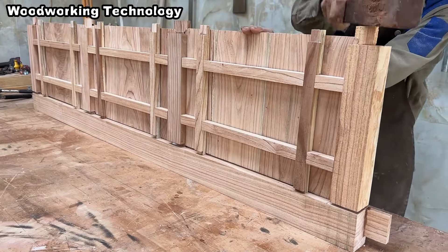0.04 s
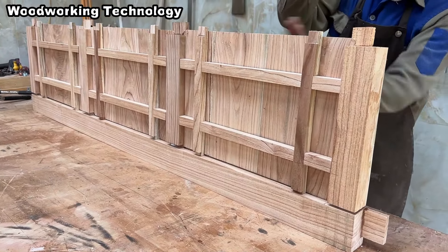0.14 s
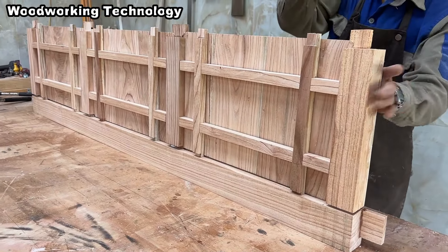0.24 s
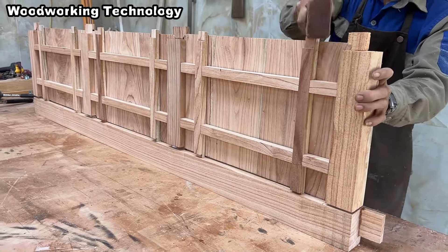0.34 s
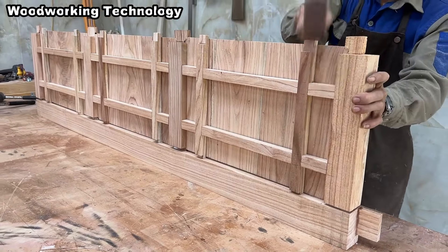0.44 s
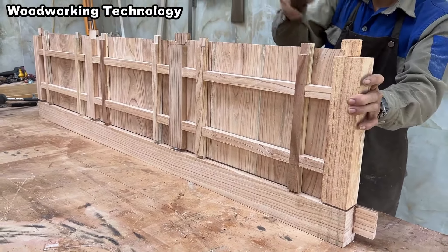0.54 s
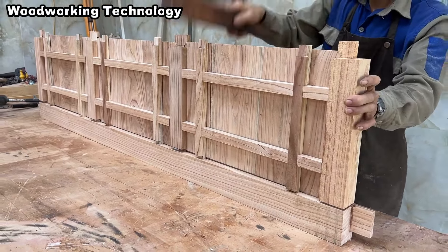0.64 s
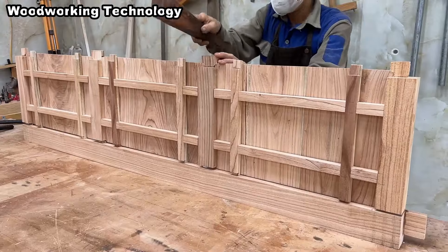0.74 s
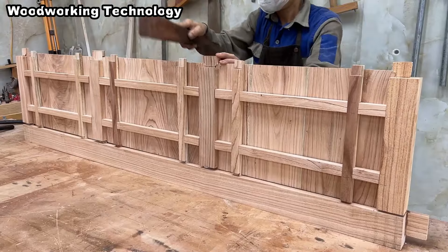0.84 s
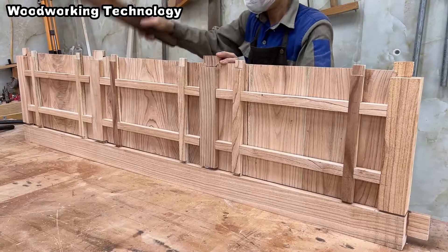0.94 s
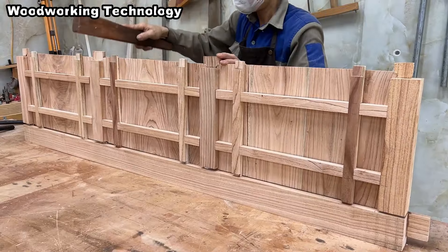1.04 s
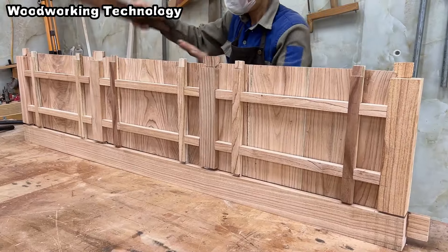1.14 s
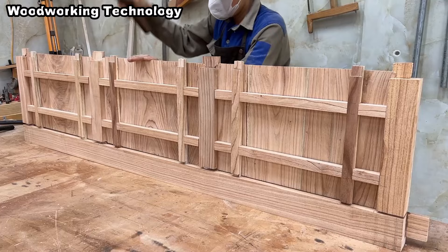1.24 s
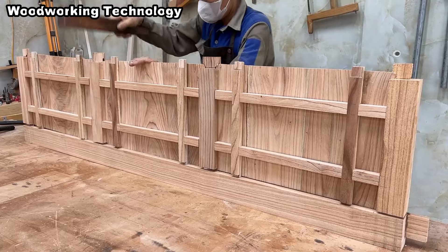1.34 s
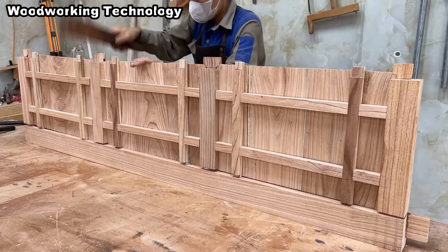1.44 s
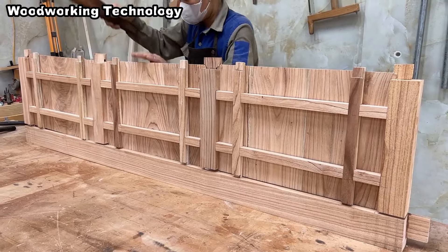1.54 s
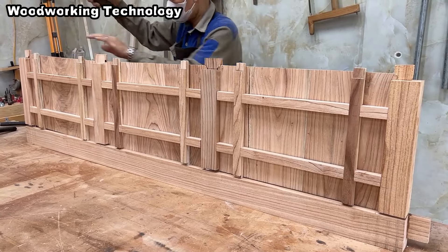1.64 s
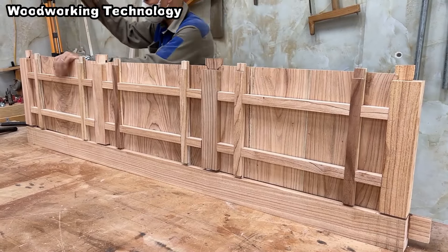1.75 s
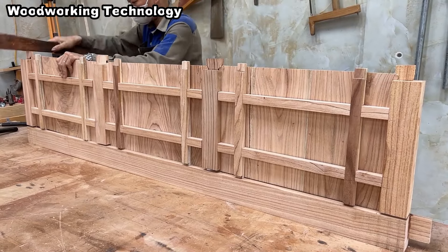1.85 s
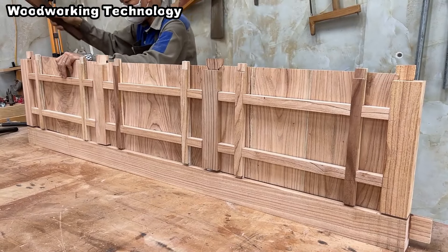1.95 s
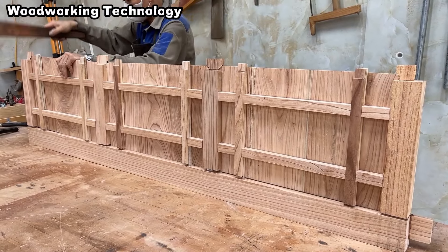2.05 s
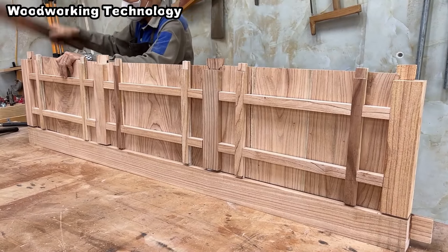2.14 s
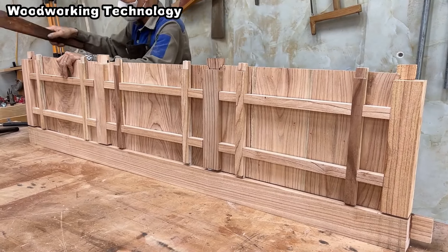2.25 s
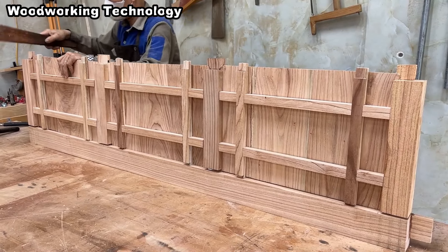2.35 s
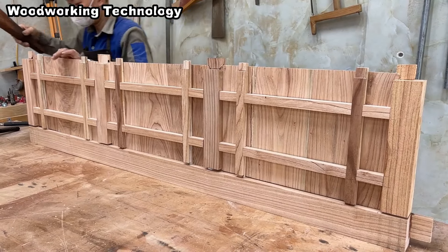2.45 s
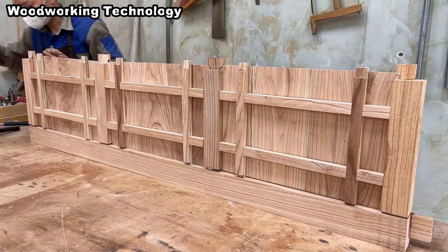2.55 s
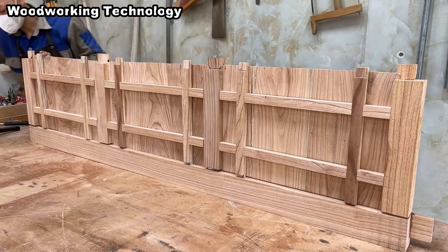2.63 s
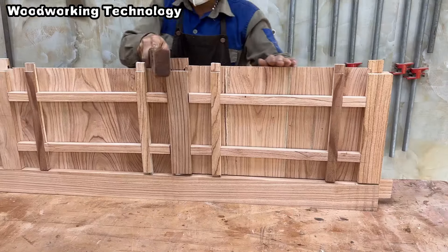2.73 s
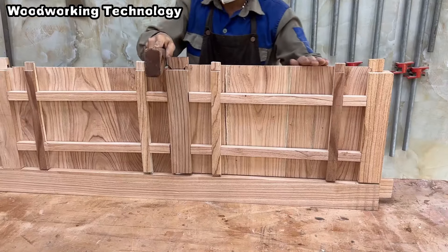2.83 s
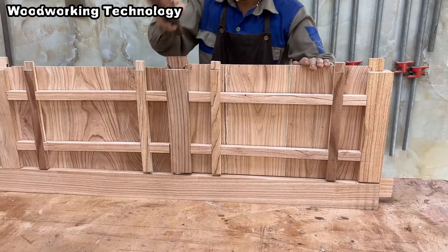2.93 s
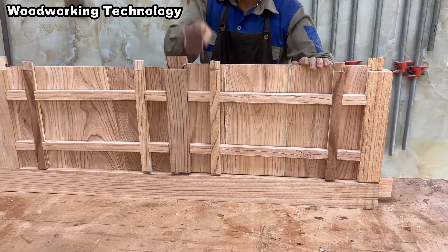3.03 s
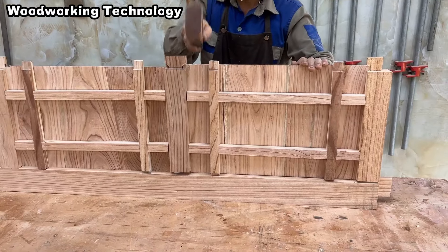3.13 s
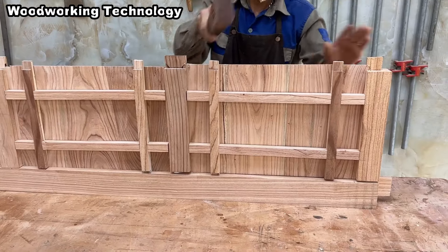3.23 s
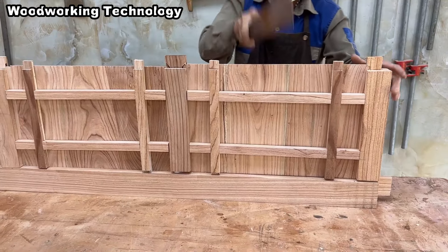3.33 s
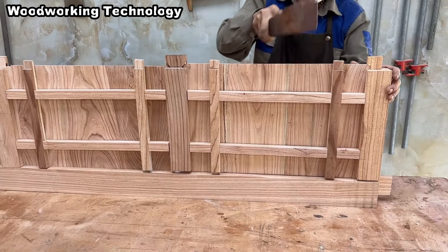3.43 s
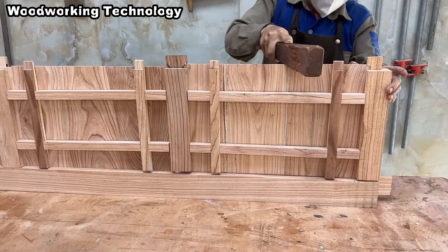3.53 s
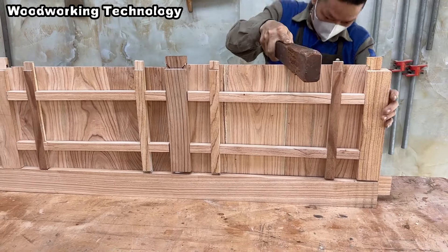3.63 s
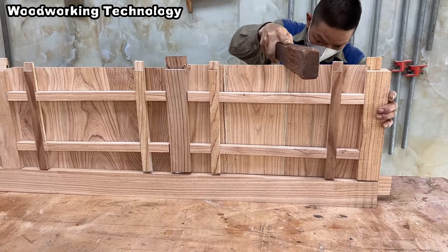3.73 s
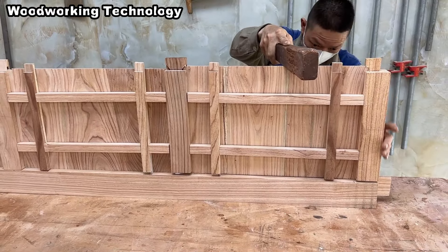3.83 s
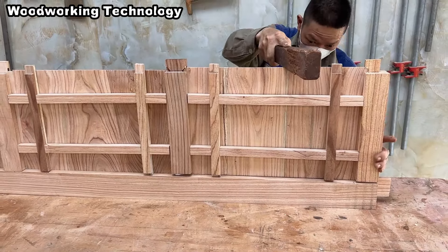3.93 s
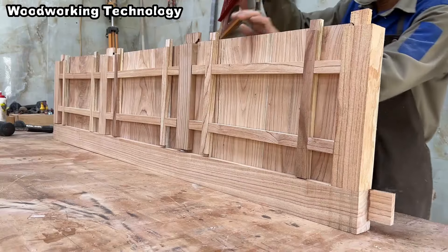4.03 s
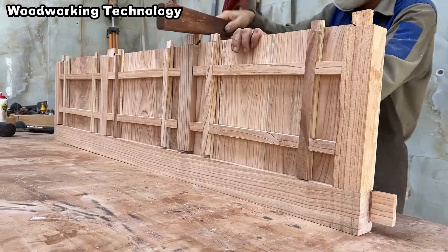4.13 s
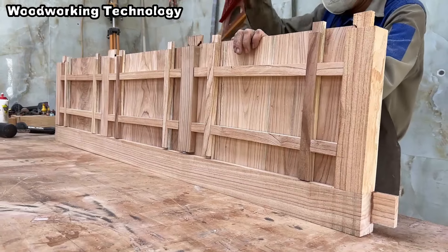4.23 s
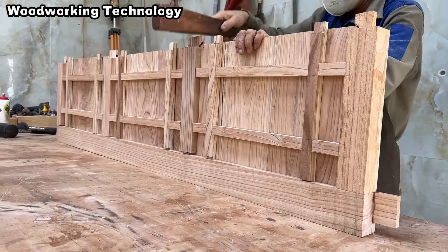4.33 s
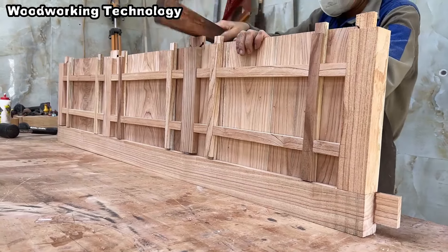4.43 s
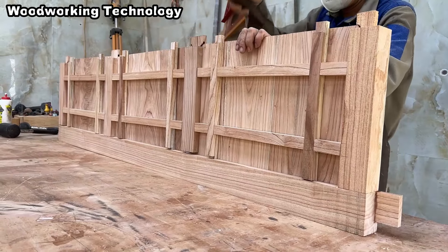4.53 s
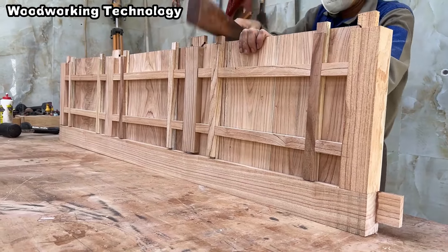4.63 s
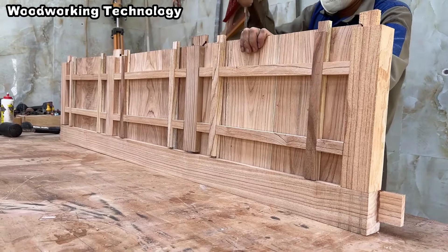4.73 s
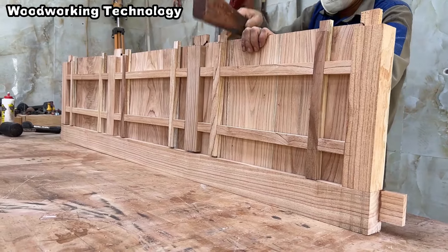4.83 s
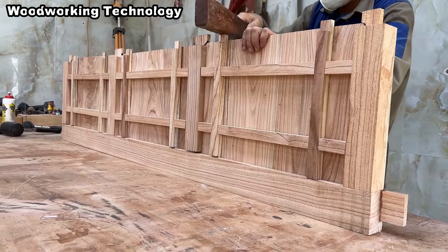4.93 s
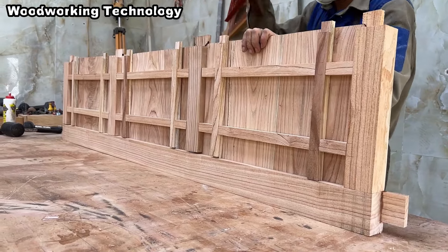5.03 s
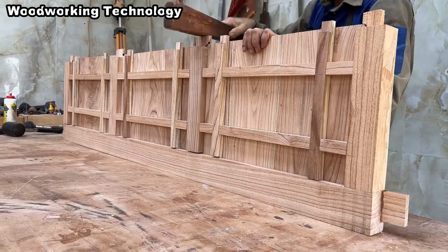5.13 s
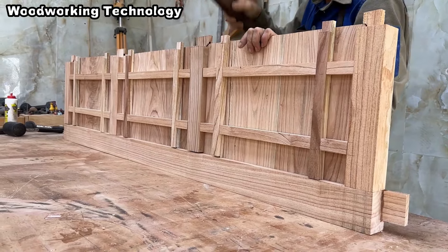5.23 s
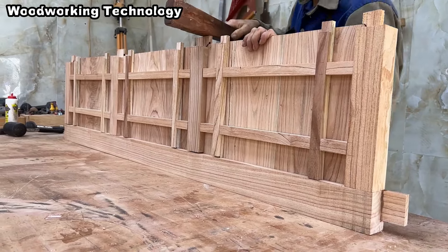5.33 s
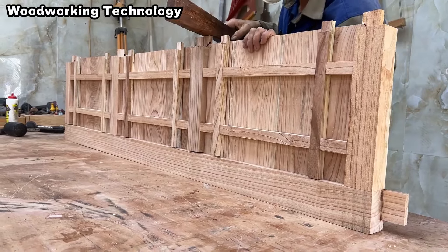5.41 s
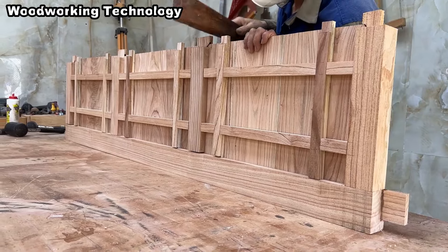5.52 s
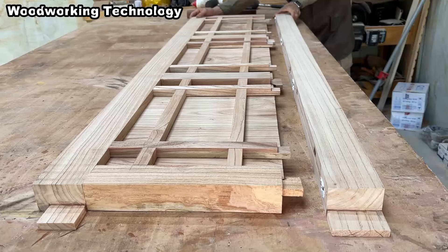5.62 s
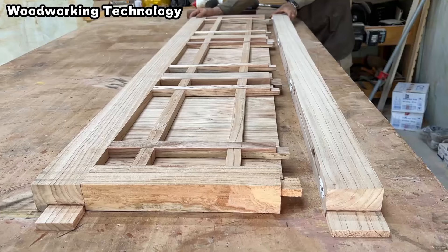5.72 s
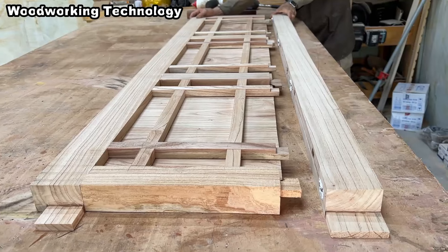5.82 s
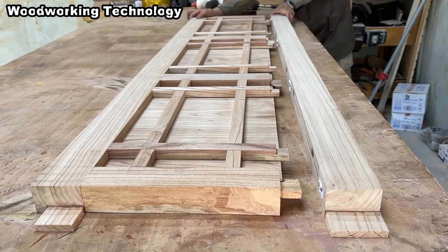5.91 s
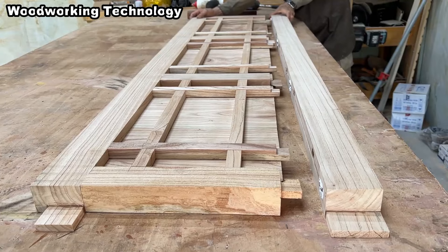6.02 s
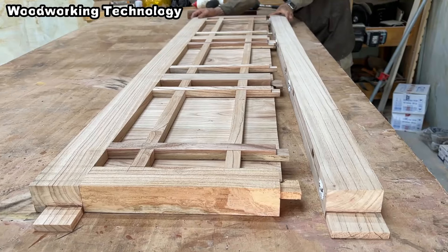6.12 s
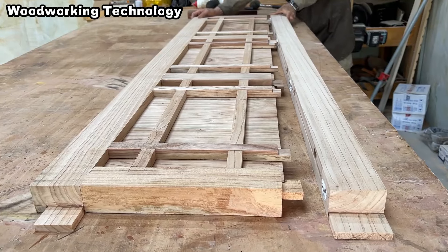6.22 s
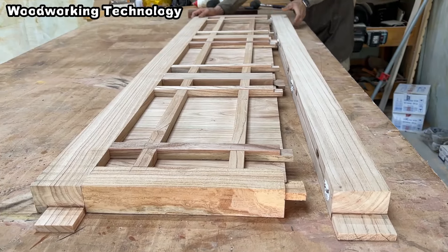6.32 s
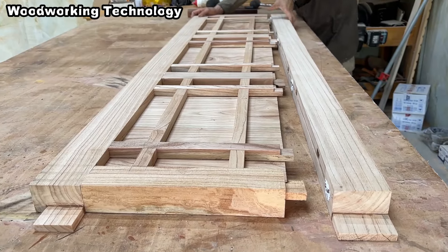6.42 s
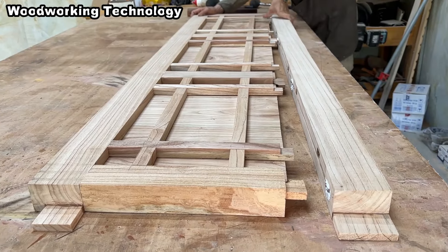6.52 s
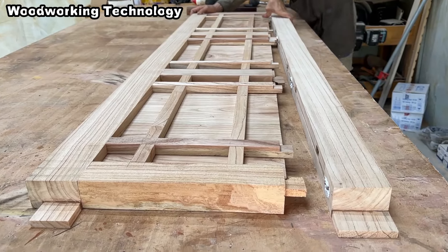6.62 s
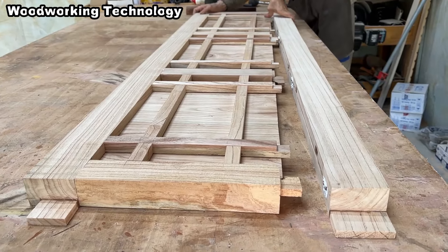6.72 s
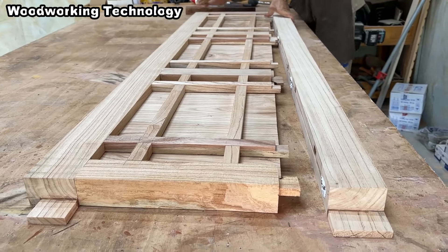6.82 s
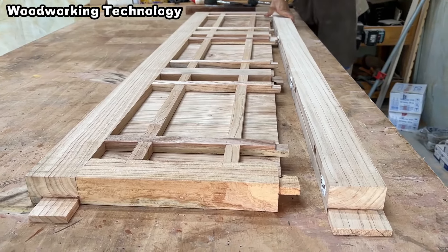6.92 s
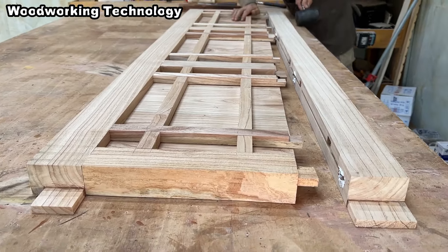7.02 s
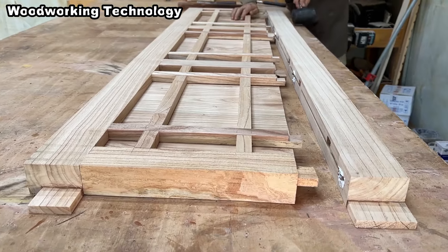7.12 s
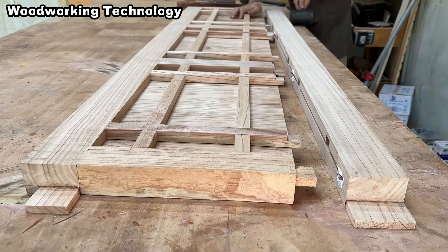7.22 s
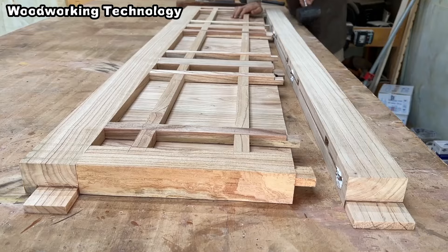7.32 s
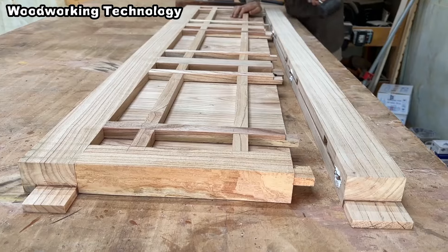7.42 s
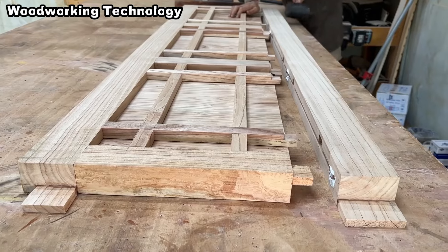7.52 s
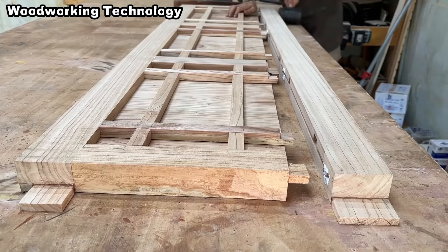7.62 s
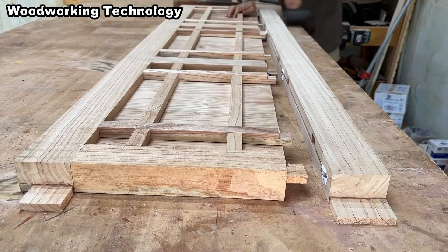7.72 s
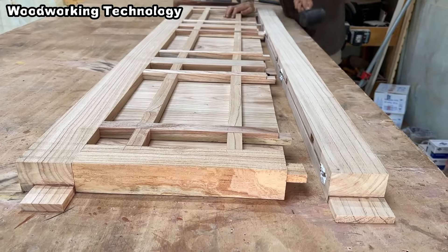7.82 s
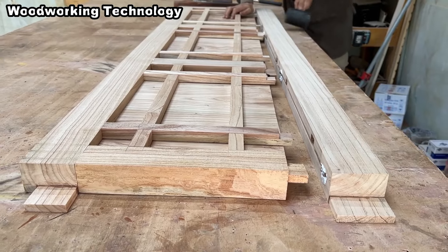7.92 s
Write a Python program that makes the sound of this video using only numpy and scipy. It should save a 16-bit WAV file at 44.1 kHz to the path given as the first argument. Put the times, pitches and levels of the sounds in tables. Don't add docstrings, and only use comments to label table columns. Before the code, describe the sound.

In a small, lively workshop, a mallet strikes a slatted wooden panel, picked up closely by a small microphone with thin bass and slight grain. Two pairs of hard knocks open the first 0.8 seconds, then a clipped blow and a tiny silent cut. From 0.82 to 2.5 quick blows move along a rail, bright and cracking at first, then deeper and duller. After a cut at 2.8, six uneven knocks follow until 3.65, then a short rub and woody creak near 3.77. From 4.25 to 5.4 eight more blows ring and rattle the slats. At 5.72 a low machine hum enters with faint fast metal clinks until 6.2; a dull palm slap lands at 6.27, wood knocks down at 6.72, and hands pat and slide. After another cut at 7.14, soft taps and rubbing lead to three loud blows at 7.6, 7.76 and 7.9.

```python
import sys
import numpy as np
from scipy import signal
from scipy.fft import rfft, irfft
from scipy.io import wavfile
from scipy.ndimage import uniform_filter1d

SR = 44100
rng = np.random.default_rng(int(sys.argv[2]) if len(sys.argv) > 2 else 0)


def undo_db(level):
    steps = np.asarray(level, float) / 20
    return 10 ** steps


def int16_out(signal):
    q = np.round(np.clip(np.atleast_2d(signal).T, -1, 1) * 32767)
    wavfile.write(sys.argv[1], SR, q.astype(np.int16))


N = 351036
LEAD = 600

# start in seconds, end in seconds.
VIEWS = [
    (0, .8137),
    (.833, 2.787),
    (2.805, 4.129),
    (4.148, 5.70),
    (5.722, 7.133),
    (7.152, 8),
]
# level in dB; the further the work stands, the wetter.
VIEW_ROOM_DB = [-30, -29, -29, -28, -29, -30]
VIEW_AIR_DB = [-52.5, -55.5, -58.5, -55, -50, -51.5]
VIEW_LAG = [0, 0, 3, 4, 0, 0]

# frequency in Hz, density in dB per Hz.
AIR_TONE = [(18, -77), (30, -56), (116, -1.5), (253, -10), (286, -16.5), (333, -13), (397, -20.5),
            (1580, -30), (12000, -45.5), (15600, -77), (22000, -120)]
# frequency in Hz, density in dB per Hz.
MACHINE_TONE = [(18, -79), (30, -52), (72, -46), (98, -7.5), (165, -3), (239, -20.5), (437, -11),
                (526, -25), (1350, -29), (5900, -42.5), (16000, -45.5)]
# frequency in Hz, level in dB.
HUM = [(103, -50), (204.6, -67), (240.5, -47), (289.5, -54.5)]
# start in seconds, level in dB.
CLINKS = [(5.849, -62), (5.92, -66), (5.959, -57), (5.981, -63.5), (6.033, -63), (6.078, -58), (6.117, -66),
          (6.157, -63), (6.198, -63)]
# frequency in Hz, level in dB, t60 in seconds.
CLINK_MODES = [(5840, 1.5, 0.012), (8700, -1, .01), (10100, -6, .01), (12400, 5, 0.013), (13500, -2, .01),
               (15300, -1.5, .01)]
# start in seconds, length in seconds, level in dB.
SLIDES = [(3.753, 0.078, -49), (5.73, 0.24, -61), (5.966, 0.1, -71), (6.073, 0.033, -67),
          (6.511, 0.41, -63), (6.819, 0.1084, -46.5), (6.927, 0.061, -52.5), (7.112, 0.27, -59.5),
          (7.245, 0.1, -61), (7.348, 0.039, -53), (7.414, 0.094, -55.5)]
# frequency in Hz, density in dB per Hz.
SLIDE_TONE = [(500, -13.5), (900, -10), (2000, -17.5), (4000, -20.5), (8000, -24.5), (13000, -25),
              (16000, -36.5)]
# start in seconds, length in seconds, start pitch in Hz, end pitch in Hz,
# level in dB, overtone level in dB.
SQUEAKS = [
    (3.771, 0.041, 545, 408, -40, -24),
    (3.943, 0.052, 2100, 2090, -73.5, -60),
    (3.973, 0.026, 2800, 2810, -57.5, -75),
]

# start in seconds, 500-1600 Hz level in dB, knock in dB, crack in dB,
# click pitch in Hz.
POST = [
    (0.015, -10.5, -1, -17.5, 2700),
    (0.1648, -9.5, -3, -14, 2680),
]
POST_TOP = [
    (0.4715, -9.5, -5.5, -12.5, 3700),
    (0.611, -7, -5, -20, 4000),
]
RAIL = [
    (0.824, -20.5, 8, 4, 2320),
    (0.9397, -11, -5, -8.5, 3640),
    (1.226, -13, -4, -12, 3620),
]
RAIL_EDGE = [
    (1.128, -12, -9, -9.5, 4100),
]
RAIL_END = [
    (1.4332, -12.5, -2, -8, 2400),
    (1.6143, -10.5, -2.6, -14, 1400),
]
FAR_END = [
    (1.986, -5.5, -8, -20, 1500),
    (2.1417, -5, -6.5, -19.5, 1550),
    (2.313, -5.5, -6.5, -18.5, 1550),
    (2.4325, -7.5, -8, -26, 2500),
]
MIDDLE = [
    (2.8648, -12.5, -1.5, -7.5, 2540),
]
MIDDLE_LOW = [
    (2.982, -12, -4, -15.5, 2000),
    (3.3045, -7, -1.5, -20.5, 1950),
]
NEAR_END = [
    (3.1887, -17, 6, -6, 2500),
    (3.4937, -8, -4.5, -13, 2450),
    (3.6392, -12.5, 2.5, -14.5, 2300),
]
BACK = [
    (4.2494, -10.5, -3, -6.5, 2380),
    (4.444, -12, -6.5, -10, 2390),
    (5.26, -10.5, -5, -10, 2500),
]
BACK_SQUARE = [
    (4.5888, -8, -7, -16, 2500),
    (5.4124, -9.5, -5.5, -13.5, 2670),
]
SLAT = [
    (4.785, -6.5, -13.5, -14.5, 4000),
    (4.941, -7.5, -13, -13.5, 3500),
]
SLAT_SQUARE = [
    (5.0516, -6.5, -11, -22, 2600),
]
PALM = [
    (6.2725, -5, -21, -38, 1050),
]
TAP = [
    (6.022, -35, -27, -32, 930),
    (7.184, -32, -26, -36, 700),
    (7.331, -31, -27, -30, 810),
]
DROP = [
    (6.7216, -10.5, -11.5, -30, 1270),
]
STILE = [
    (7.6132, -3, -9.5, -25.5, 1420),
    (7.7638, -3.5, -11.5, -26, 1490),
    (7.8953, -4, -10, -26, 1500),
]
# start in seconds, level in dB, knock in dB, crack in dB,
# left minus right in dB.
TICKS = [
    (0.415, -52, 2, 1, 1),
    (0.8107, -11, -3, -7, 2),
    (2.77, -77.5, -6, -17.5, -4),
    (5.69, -37.5, -3.5, -8.5, 6.5),
    (6.51, -62.5, -44, 9.5, 13.5),
    (7.127, -55, 0, -27, -11),
    (7.205, -33.5, -11, -44, 2),
]
# start in seconds, level in dB, knock in dB, crack in dB, left minus right in dB.
PATS = [
    (6.832, -32.5, -4.5, -43, 0.1),
    (6.942, -33.5, -8.5, -31.5, -0.5),
]

# frequency in Hz, level in dB, t60 in seconds.
POST_MODES = [(189, -9.5, 0.055), (238, 0, 0.06), (300, -6.5, .07), (447, -8, 0.05), (554, -7.5, 0.033),
              (632, -3, 0.086), (724, -4.5, .07), (920, -16, 0.092), (1385, 2.5, .07), (1448, -9, .07),
              (1726, -3, .08), (2450, -1.5, .085), (2960, -7, .04)]
POST_TOP_MODES = [(177, 5, 0.039), (282, -5, 0.14), (413, -6.5, 0.045), (494, -8, 0.12), (580, -9.5, .12),
                  (713, -2, 0.13), (850, -2.5, .06), (1264, -2.5, .06), (1390, -7, 0.076), (1489, -1, 0.12),
                  (1605, -7, 0.052), (1700, -7, 0.078), (2460, -11.5, .08)]
RAIL_MODES = [(128.3, -6, .2), (186, -2, .07), (253, -1, 0.1), (313.7, -3.5, .07), (390, -1, .1),
              (540, 6, 0.068), (603, -2.5, 0.13), (713, -7.5, 0.1), (772, -2.5, 0.063), (833, -3, 0.088),
              (940, -4.5, 0.13), (1058, -5, 0.18), (1315, -8, 0.16), (1570, -4, 0.074)]
RAIL_END_MODES = [(135, -4, 0.16), (217, 0.5, 0.084), (289.7, 2.5, 0.088), (386, -4.5, .12),
                  (650, -3.5, 0.061), (684, -3, 0.14), (770, 4.5, 0.046), (981, 0, 0.14), (1242, 1, .07),
                  (1570, -1, 0.099), (2420, -3, 0.09), (2580, -4.5, 0.075), (3211, -13, 0.044)]
FAR_MODES = [(137.5, -11, 0.17), (238, 1.5, 0.11), (247.6, -6.5, 0.14), (358, -11.5, .15),
             (611, -13.5, .18), (659, -4.5, 0.11), (730, 6, 0.075), (921, -8, 0.13), (980, -0.5, .07),
             (1300, -3, 0.09), (1487, -9, .05), (1890, -9, .06), (2460, -5, .12), (2670, -6.5, 0.044)]
MIDDLE_MODES = [(131.6, 8, 0.18), (264, -4, 0.18), (482, -6, 0.074), (620, -9, 0.096), (618, 1, 0.047),
                (853, -14.5, 0.06), (850, -9, 0.031), (913, 3.5, 0.065), (1380, 10, 0.035),
                (1945, -11.5, 0.045), (2310, -14, 0.086), (2452, -8.5, 0.053), (2520, 13, 0.04)]
NEAR_MODES = [(146.5, -11, 0.12), (232.5, -2, 0.075), (286, -4, 0.086), (500, -3, 0.05), (610, 4, 0.055),
              (640, -6.5, 0.07), (758, 1, 0.087), (950, 5.5, 0.04), (1280, -8.5, 0.033), (1370, -22, 0.13),
              (1684, -3, 0.063), (1790, 7, 0.14), (1900, -1.5, 0.05), (2510, -4.5, 0.055)]
BACK_MODES = [(142.2, -4, 0.16), (253, 0, 0.088), (353.6, -2.5, 0.12), (452, -8, 0.11), (555, -7.5, 0.18),
              (599, 4, 0.11), (700, 2.5, 0.071), (968, -2, 0.08), (1115, -6.5, 0.047), (1245, 5, 0.025),
              (1370, 4, 0.076), (1898, -4, 0.21), (2440, 1.5, 0.1), (2640, -1.5, 0.09)]
SLAT_MODES = [(139, -14, 0.16), (236.3, -7.5, 0.075), (325, -14.5, 0.117), (462, -2.5, 0.09),
              (596, -7.5, 0.11), (610, 5.5, 0.105), (713, -4, .09), (858, -16, 0.049), (890, -17, 0.072),
              (1030, -2.5, 0.09), (1140, -11, .1), (1256, -6, 0.058), (1740, -32, 0.095), (2630, -14, 0.17)]
PALM_MODES = [(160, -7, 0.059), (203, 1.5, 0.049), (330, 4, 0.04), (536, -19, .06), (644, -2, 0.1),
              (706, -11, .1), (796, 1, 0.077), (940, -1.5, 0.056), (1232, -23, 0.041), (1370, 1.5, .06),
              (1900, -9, 0.034)]
TAP_MODES = [(138, -1, 0.12), (242, 3, 0.049), (337, 0, 0.06), (403, 0.5, .06), (686, -5, .05),
             (780, -7, .08), (1320, -5, 0.035)]
DROP_MODES = [(445, -6, .06), (633, -4.5, 0.14), (804, -0.5, 0.16), (875, -1, 0.11), (974, 0, 0.068),
              (1250, 1, 0.077), (1500, -1, 0.045), (2600, 2, 0.06), (2980, -7, 0.063), (4350, -8, 0.06)]
STILE_MODES = [(255, -13.5, .14), (376, -17, 0.24), (600, -6, 0.11), (700, -9.5, .18), (783, 3.5, .1),
               (823, -4, 0.11), (900, 0.5, .11), (1130, -9, .06), (1220, 3.5, 0.08), (1350, -3, .06),
               (1547, -6.5, .07), (2040, -8, 0.3), (2600, -3, .05)]
PLACES = dict(
    post=(POST, POST_MODES), top=(POST_TOP, POST_TOP_MODES),
    rail=(RAIL, RAIL_MODES), edge=(RAIL_EDGE, RAIL_MODES), end=(RAIL_END, RAIL_END_MODES),
    far=(FAR_END, FAR_MODES), middle=(MIDDLE, MIDDLE_MODES), low=(MIDDLE_LOW, NEAR_MODES),
    near=(NEAR_END, NEAR_MODES), back=(BACK, BACK_MODES), square=(BACK_SQUARE, BACK_MODES),
    slat=(SLAT, SLAT_MODES), flat=(SLAT_SQUARE, SLAT_MODES),
    palm=(PALM, PALM_MODES), tap=(TAP, TAP_MODES), drop=(DROP, DROP_MODES), stile=(STILE, STILE_MODES))
# left minus right in dB, click in dB,
# ring in dB, extra top in dB.
CONTACT = dict(post=(.2, 25, 6.7, 8), top=(.2, 25, 4.5, 7), rail=(.2, 28.5, 4.5, -4),
           edge=(.2, 19, 4.5, -4), end=(.2, 19, 5, 3), far=(.1, 26, 10.5, 3.5), middle=(1.1, 22, 7.3, .1),
           low=(.6, 32, 7.5, .1), near=(0.2, 33.5, 7, -5.5), back=(.7, 18, 6, -1.1),
           square=(.7, 18.5, 6, -1.1), slat=(.6, 17.5, 8, 3), flat=(.6, 23, 8, .2),
           palm=(-.2, 14, 8.5, 1.1), tap=(-1.1, 15, 9, 0.4), drop=(0.8, 18.5, 9.5, -14),
           stile=(0.092, 27, 7.5, -2.1))
# bass lag in seconds,
# low knock pitch in Hz, low knock in dB, mallet face in dB.
PATH = dict(post=(.0006, 860, -5, -22), top=(.0004, 1000, 1.5, -16), rail=(.0015, 1650, 0.2, -1.5),
        edge=(.003, 1000, -15, 1.5), end=(.0008, 2300, -4, -12), far=(.0012, 2400, -4, -7),
        middle=(.0015, 1400, -6, -8), low=(.0008, 800, -7, -15), near=(.0004, 850, -5, -13),
        back=(.003, 800, -8, 9), square=(.0006, 1100, 6, 5), slat=(.0025, 800, -3, -4),
        flat=(.0005, 1010, 7, -12), palm=(.0025, 600, -8, -30), tap=(.001, 400, -8, -30),
        drop=(.0004, 850, -5, -15), stile=(.0006, 780, -7, -20))
PLACE_THUD_DB = dict(post=-18.5, top=-21.5, rail=-20.5, edge=-20.5, end=-21.5, far=-20.5, middle=-29.5, low=-29.5, near=-24.5, back=-23.5, square=-23.5, slat=-28.5, flat=-28.5, palm=-22.5, tap=-21.5, drop=-31.5, stile=-33)
# frequency in Hz, density in dB per Hz.
RATTLE = [(24, -49), (40, -26.5), (209, -2.5), (363, -4), (733, -4.5), (1090, -7.5), (1810, -7),
          (2000, -11), (2440, -13), (11300, -35), (16000, -45)]
# frequency in Hz, t60 in seconds.
RATTLE_T60 = [(60, 0.12), (250, 0.11), (1000, 0.11), (3000, 0.094), (8000, 0.14), (14000, 0.21)]
# low edge in Hz, high edge in Hz.
REGISTERS_HZ = [(100, 400), (500, 1600), (1800, 4600), (5000, 12000)]
REGISTER_TRIM_DB = [1.5, -7, -1.5, 0.5]

# frequency in Hz, level in dB, t60 in seconds.
ROOM = [(100, -28.5, .6), (300, -10.5, 0.3), (1000, -16, 0.31), (2710, -11, 0.29), (6100, -4, 0.25),
        (9700, -24, 0.037), (15000, -27, .2)]
# frequency in Hz, left-right correlation.
LIKENESS = [(40, 0.23), (120, 1), (500, 0.94), (1000, 0.79), (2000, 0.15), (4000, 0.3), (12000, 0.064)]
# frequency in Hz, noise level in dB.
GRAIN = [(100, -23), (500, -12.5), (1500, -16.5), (4000, -10.5), (8000, -7), (14000, 1.5)]
# frequency in Hz, dB against the mid band, dB against the neighbours.
MASK = [(6000, -60, -40), (8000, -31, -8), (10000, -25, -2), (12500, -21, 1), (14000, -15, 2),
        (15300, -12, 4), (16200, -8, 9)]


def read(table, hz, column=1):
    table = np.array(table, float)
    return np.interp(np.log(np.maximum(hz, 1)), np.log(table[:, 0]), table[:, column])


def fade(t, t60):
    return np.exp(-np.log(1000) * t / t60)


def add(out, s, sound):
    start = int(s * SR)
    out[:, start:start + sound.shape[1]] += sound


def pair(size):
    hz = np.fft.rfftfreq(size, 1 / SR)
    like = np.clip(read(LIKENESS, hz), 0, 1)
    mid, side = rfft(rng.standard_normal((2, size)))
    sides = np.array([[1], [-1]])
    return hz, np.sqrt((1 + like) / 2) * mid + np.sqrt((1 - like) / 2) * side * sides


def banded(size, shape):
    hz, noise = pair(size)
    octave = np.log2(np.maximum(hz, 1))
    out = 0
    for centre in np.arange(11, 29) / 2:
        band = np.clip(1 - 2 * abs(octave - centre), 0, 1)
        out = out + shape(2 ** centre) * irfft(noise * band, size)
    return out


def steady(tone, flicker_db, rate):
    knots = np.arange(0, N, SR // rate)

    def shape(hz):
        flicker = np.interp(np.arange(N), knots, rng.standard_normal(len(knots)))
        return undo_db(read(tone, hz) + flicker_db * flicker)

    x = banded(N, shape)
    return x / x.std()


def background(t, running):
    machine = steady(MACHINE_TONE, flicker_db=2.0, rate=9)
    air = steady(AIR_TONE, flicker_db=3, rate=14)
    view = np.searchsorted(np.array(VIEWS)[1:, 0], t)
    return np.where(running, machine, air) * undo_db(np.array(VIEW_AIR_DB)[view])


def machine_hum(t):
    waver_db, waver_rad, hop = 5, 1, 441
    waver = uniform_filter1d(rng.standard_normal((len(HUM), N // hop + 1)), size=16, axis=1)
    waver = waver.repeat(hop, axis=1)[:, :N]
    out = np.zeros(N)
    for (hz, db), w in zip(HUM, waver):
        phase = 2 * np.pi * hz * t + waver_rad * uniform_filter1d(w, size=hop)
        out += undo_db(db + 1.5 + waver_db * w) * np.sin(phase)
    return out


def clinks():
    out, t = np.zeros((2, N)), np.arange(SR // 20) / SR
    hz, db, t60 = np.array(CLINK_MODES).T[:, :, None]
    for s, level_db in CLINKS:
        luck = rng.standard_normal((2, len(hz), 1))
        level = undo_db(level_db + db + 3.5 * luck)
        add(out, s, np.sum(level * fade(t, t60) * np.sin(2 * np.pi * hz * t), axis=1))
    return out


def sliding_hands(t):
    attack_s, sag_db = 0.016, -16
    level = np.zeros(N)
    for s, length, db in SLIDES:
        sag = sag_db * np.maximum(t - s, 0) / length
        level += undo_db(db + sag) * np.clip((t - s) / attack_s, 0, 1)
    return undo_db(8.0) * level * steady(SLIDE_TONE, flicker_db=4.0, rate=81)


def workshop():
    t = np.arange(N) / SR
    running = t > VIEWS[4][0]
    return background(t, running) + machine_hum(t) * running + clinks() + sliding_hands(t)


def squeaks():
    out = np.zeros(N)
    for s, length, from_hz, to_hz, db, over_db in SQUEAKS:
        part = np.arange(int(length * SR)) / (length * SR)
        phase = 2 * np.pi * np.cumsum(from_hz + (to_hz - from_hz) * part) / SR
        stack = sum(undo_db(over_db * k * part) * np.sin((k + 1) * phase) for k in range(3))
        swell = np.minimum(8 * part, 1) * (1 - part) ** 0.26
        out[int(s * SR):int(s * SR) + len(part)] += undo_db(db) * stack * swell
    return out


def frame_ring(modes, t):
    early_db, early_t60_s, blur_share, hop = 1.5, .03, .022, 16
    hz, db, t60 = np.repeat(np.array(modes, float), 4, axis=0).T[:, :, None]
    detune, level_luck, skew_luck = rng.standard_normal((3, len(hz), 1))
    hz = hz * (1 + (.005 + .013 * np.minimum(hz / 2500, 1)) * detune)
    t60 = np.clip(t60, .02, .14)
    skew = 0.11 * skew_luck * np.sqrt(1 - np.clip(read(LIKENESS, hz), 0, 1))
    early = 1 + undo_db(early_db) * fade(t, early_t60_s)
    swell = undo_db(db + 1.5 * level_luck) * fade(t, t60) * early * (1 - np.exp(-t * hz / 2.4))
    blur_hz = blur_share * hz * np.minimum(hz / 600, 1)
    step = np.sqrt(2 * np.pi * blur_hz * hop / SR) * rng.standard_normal((len(hz), len(t) // hop))
    wander = np.cumsum(step * (t[::hop] > 0), axis=1).repeat(hop, axis=1)
    wander = uniform_filter1d(wander, size=hop, axis=1)
    phase = 2 * np.pi * hz * t + wander
    return np.array([np.sum(swell * np.sin(phase + way * skew), axis=0) for way in (1, -1)])


def slat_rattle(t):
    def shape(hz):
        rise = 1 - np.exp(-t * min(hz, 3000) / 2.0)
        burst = undo_db(22.0 * min(hz / 2500, 1)) * fade(t, 0.0033)
        return undo_db(read(RATTLE, hz)) * rise * (fade(t, read(RATTLE_T60, hz)) + burst)

    return banded(len(t), shape)


def mallet_click(t, click_hz, low_hz, low_db, face_db):
    length_s, fall, overtone_db, face_hz = .0027, 0.83, -12.5, 5850
    bounce_s, bounce_db = 0.0073, -16.5
    pitch_luck, face_luck, bounce_luck, delay_luck = rng.standard_normal(4)
    part = np.minimum(t / length_s, 1)
    turn = 2 * np.pi * click_hz * (1 + 0.0033 * pitch_luck) * t * (1 + fall * (.5 - part / 2))
    overtone = undo_db(overtone_db) * (1 - part) * np.sin(1.6 * turn)
    low_knock = undo_db(low_db) * np.sin(turn * low_hz / click_hz)
    face = undo_db(face_db) * (1 - part) * np.sin(2 * np.pi * face_hz * (1 + .04 * face_luck) * t)
    click = np.sin(np.pi * part ** 0.94) * (np.sin(turn) + overtone + low_knock + face)
    delay = int(bounce_s * SR * (1 + 0.13 * delay_luck))
    return click + undo_db(bounce_db + 2 * bounce_luck) * np.roll(click, delay)


def blow(modes, mid_db, thud_db, knock_db, crack_db, pan_db, click_db=26, ring_db=5.0, top_db=0,
         click_hz=2900, path=(.0002, 1000, 1.5, -8.0), size=12000):
    t = np.maximum(np.arange(size) - LEAD, 0) / SR
    lag_s, low_hz, low_db, face_db = path
    ring, rattle = frame_ring(modes, t), slat_rattle(t)
    click = mallet_click(t, click_hz, low_hz, low_db, face_db)
    sound = rfft(undo_db(ring_db) * ring / ring.std() + undo_db(6.5) * rattle / rattle.std() + undo_db(click_db) * click)
    hz = np.fft.rfftfreq(size, 1 / SR)
    want_db = mid_db + np.array([thud_db, 0, knock_db, crack_db]) + REGISTER_TRIM_DB
    mono, peak = sound.mean(axis=0), []
    for low, high in REGISTERS_HZ:
        band = irfft(mono * (hz > low) * (hz < high), size)
        peak.append(uniform_filter1d(band ** 2, size=200).max())
    centres = np.sqrt(np.prod(REGISTERS_HZ, axis=1))
    colour = np.transpose([centres, want_db - 10 * np.log10(peak)])
    top = top_db * np.clip(hz / 5000 - 1.6, 0, 1.3)
    sound = sound * np.exp(-2j * np.pi * lag_s * 1500 * np.arctan(hz / 1500))
    pan = undo_db(np.array([[pan_db], [-pan_db]]) / 2)
    return irfft(sound * undo_db(read(colour, hz) + top), size) * pan


def light_touches(out):
    for touches, thud_db in ((TICKS, -27), (PATS, -4)):
        for s, db, knock_db, crack_db, pan_db in touches:
            sound = blow(STILE_MODES, db, thud_db, knock_db, crack_db, pan_db)
            t = np.maximum(np.arange(sound.shape[1]) - LEAD, 0) / SR
            add(out, s, sound * fade(t, 0.09))


def mallet():
    thud_follows = 0.51
    out = np.zeros((2, N + SR))
    light_touches(out)
    for name, (blows, modes) in PLACES.items():
        for s, db, knock_db, crack_db, click_hz in blows:
            thud_db = PLACE_THUD_DB[name] + thud_follows * (db + 10.5) - db
            add(out, s, blow(modes, db, thud_db, knock_db, crack_db, *CONTACT[name], click_hz, PATH[name]))
    return out[:, LEAD:N + LEAD]


def echo(work, room_db):
    blur_hz = 22
    t = np.arange(SR // 2) / SR
    size, mono = work.shape[1], work.mean(axis=0)

    def shape(hz):
        return undo_db(read(ROOM, hz) + room_db) * fade(t, read(ROOM, hz, column=2)) * np.minimum(t / 0.0024, 1)

    roam = np.cumsum(rng.standard_normal(size)) * np.sqrt(2 * np.pi * blur_hz / SR)
    roam = uniform_filter1d(roam, size=100)
    wet = 0
    for share in (np.cos(roam), np.sin(roam)):
        tail = banded(len(t), shape)
        wet = wet + signal.fftconvolve((share * mono)[None], tail, axes=1)[:, :size]
    return wet


def scene():
    work, back = mallet() + squeaks(), workshop()
    out = np.zeros((2, N))
    for (start, end), room_db, lag in zip(VIEWS, VIEW_ROOM_DB, VIEW_LAG):
        a, b = int(start * SR), min(int(end * SR), N)
        direct = np.array([work[0, a:b], work[1, a - lag:b - lag]])
        ramp = np.arange(b - a)
        edge = np.clip(np.minimum(ramp, ramp[::-1]) / 40, 0, 1)
        out[:, a:b] = (direct + echo(work[:, a:b], room_db) + back[:, a:b]) * edge
    return out


def grain_and_thin(mix):
    block, shift, cut_hz = 2048, 762, 16290
    padded = np.pad(mix, ((0, 0), (shift, 0)))
    hz, _, lines = signal.stft(padded, SR, "cosine", nperseg=block)
    local = np.sqrt(uniform_filter1d(abs(lines) ** 2, size=24, axis=1))
    grain = undo_db(read(GRAIN, hz))[:, None] * local
    lines = lines + grain * np.exp(2j * np.pi * rng.random(lines.shape))
    body = abs(lines[:, (hz > 500) & (hz < 5000)]).mean(axis=(0, 1))
    bins, blocks = lines.shape[1:]
    luck = rng.standard_normal((bins // 32 + 1, blocks // 2 + 1))
    luck = np.kron(luck, np.ones((32, 2)))[:bins, :blocks]
    under_body = undo_db(read(MASK, hz))[:, None] * body
    under_near = undo_db(read(MASK, hz, column=2))[:, None] * local.mean(axis=0)
    heard = abs(lines).mean(axis=0) > undo_db(6 * luck) * np.maximum(under_body, under_near)
    kept = lines * heard * (hz < cut_hz)[:, None]
    return signal.istft(kept, SR, "cosine", nperseg=block)[1][:, shift:shift + N]


def band_limit(x):
    return signal.sosfilt(signal.butter(12, 16290, fs=SR, output="sos"), x)


def record(dry):
    mic_hz = [87, 16600]
    heard = signal.sosfilt(signal.butter(2, mic_hz, "bandpass", fs=SR, output="sos"), dry)
    soft = np.tanh(0.85 * heard) / 0.95
    mix = grain_and_thin(soft)
    return band_limit(mix)


dry = scene()
out = record(dry)
int16_out(out)
```